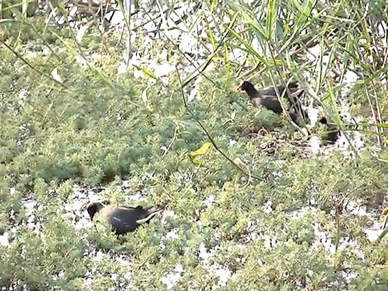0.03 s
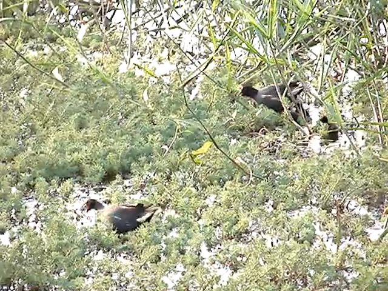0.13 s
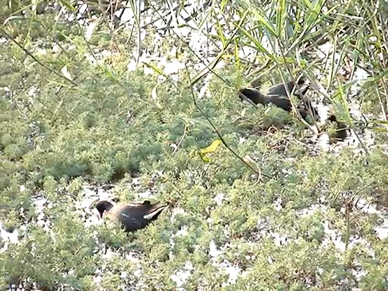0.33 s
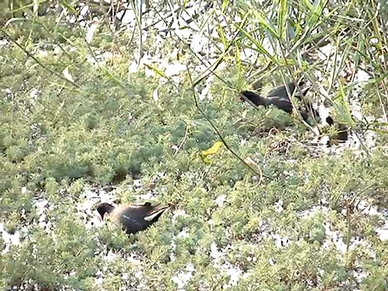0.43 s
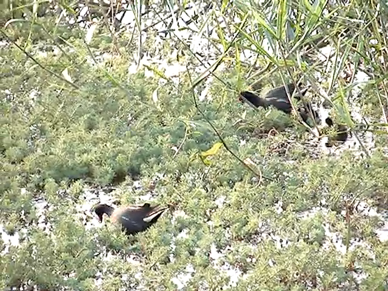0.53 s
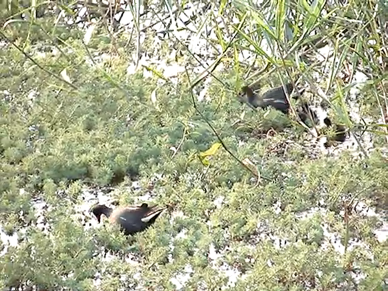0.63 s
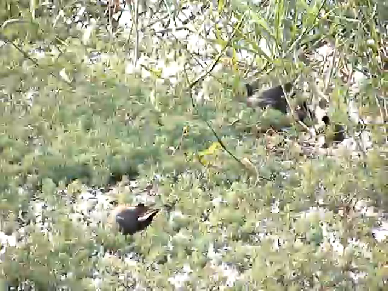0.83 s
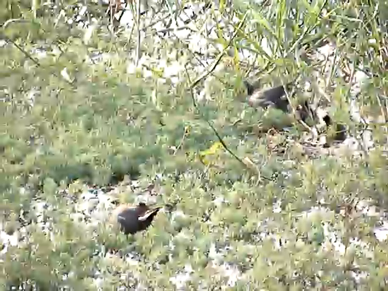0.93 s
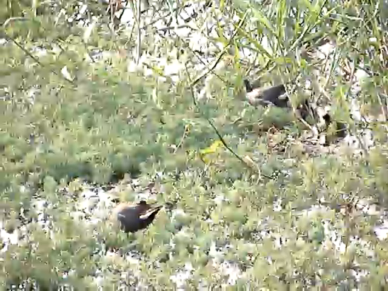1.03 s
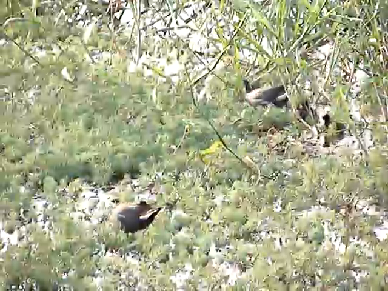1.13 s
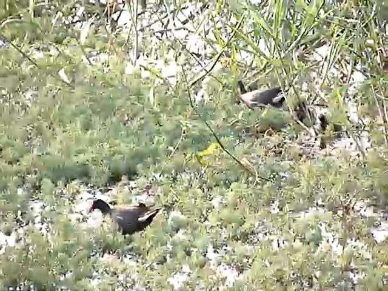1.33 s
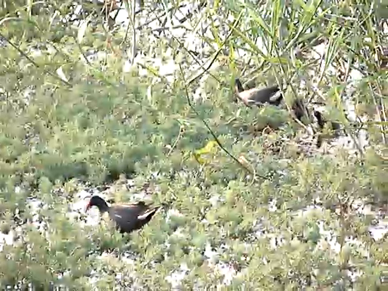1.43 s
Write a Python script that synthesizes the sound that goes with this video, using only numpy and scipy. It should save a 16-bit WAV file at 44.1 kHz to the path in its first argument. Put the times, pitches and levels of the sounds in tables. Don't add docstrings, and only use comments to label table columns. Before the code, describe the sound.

One loud, very short moorhen yelp comes early from a few metres away, echoing faintly across an open marsh; insects sizzle, a distant small bird whistles thinly, and wind increasingly buffets a small camera microphone.

```python
import sys
import numpy as np
from scipy import signal
from scipy.io import wavfile
from scipy.ndimage import uniform_filter1d

SR = 44100
rng = np.random.default_rng(int(sys.argv[2]) if len(sys.argv) > 2 else 0)


def to_wav(sig):
    pcm = np.clip(np.atleast_2d(sig), -1, 1) * 32767
    pcm = np.round(pcm).astype(np.int16)
    wavfile.write(sys.argv[1], SR, pcm.T)


def decibels_to_gain(level_db):
    exponent = np.asarray(level_db, float) / 20
    return 10 ** exponent


N = 66150


def level(x, db):
    return x * decibels_to_gain(db) / np.sqrt(np.mean(x ** 2))


def band(x, hz, width_hz):
    return signal.lfilter(*signal.iirpeak(hz, hz / width_hz, fs=SR), x)


def walk(rate):
    hold = int(SR / rate)
    held = rng.standard_normal(3000)[np.arange(N) // hold]
    slewed = uniform_filter1d(uniform_filter1d(held, hold), hold)
    return level(slewed, 0)


def gate(t, start, length, edge):
    ramp = np.clip(np.minimum(t - start, start + length - t) / edge, 0, 1)
    return np.sin(np.pi / 2 * ramp) ** 2


def late(x, delay):
    return np.interp(np.arange(N) - delay * SR, np.arange(N), x, left=0)


def blur(x, length):
    age = np.arange(SR // 4) / SR
    burst = rng.standard_normal(len(age)) * np.exp(-age / length)
    return signal.fftconvolve(x, burst / np.sqrt(np.sum(burst ** 2)))[:N]


# frequency in Hz, density in dB per Hz.
AIR_COLOUR = [(60, -6.5), (250, 1.5), (800, 5), (1800, 0), (2800, -13), (3900, -9), (7000, -62),
              (10000, -21)]


def air():
    table_hz, table_db = np.array(AIR_COLOUR).T
    out = 0
    for hz in 25 * 2 ** np.arange(0, 8.8, 1 / 3):
        noise = band(band(rng.standard_normal(N), hz, hz / 3), hz, hz / 2)
        flicker_db = 1.5 * walk(8.95)
        out = out + decibels_to_gain(np.interp(np.log(hz), np.log(table_hz), table_db) + flicker_db) * noise
    return level(out, -48.5)


def hum(t):
    hum_hz, hum_db, fade_s = 175, -58.5, .5
    line = np.sin(2 * np.pi * np.cumsum(hum_hz * (1 + 0.0031 * walk(6.6))) / SR)
    return decibels_to_gain(hum_db + 0.77 * walk(16)) * np.sqrt(2) * line / (1 + (t / fade_s) ** 4)


# time in seconds, level in dB.
GUSTS = [(0.4, -52), (0.482, -46), (0.522, -55.5), (0.546, -43), (0.712, -52.5), (0.76, -35), (0.788, -47),
         (1.042, -39), (1.082, -46), (1.178, -41.5), (1.202, -44.5), (1.248, -35.5), (1.272, -56),
         (1.312, -35), (1.364, -47), (1.394, -32.5), (1.454, -50), (1.5, -39.5)]


def rumble(hz, width_hz):
    wide = band(rng.standard_normal(N), hz, width_hz)
    return band(band(wide, hz, 1.53 * width_hz), hz, 3 * width_hz)


def wind(t):
    calm_db = -63.5
    gust_db = np.interp(t, *np.array(GUSTS).T, left=calm_db)
    flutter_db = walk(24.76)
    low = level(rumble(85, 81) * decibels_to_gain(flutter_db), -1)
    top = level(rumble(205, 170) * decibels_to_gain(1.7 * flutter_db), -10)
    push = decibels_to_gain(uniform_filter1d(gust_db, SR // 8)) * level(rumble(42, 45), -5)
    return decibels_to_gain(gust_db) * (low + top) + push


# centre in Hz, width in Hz, level in dB, throbs per second, throb depth in dB.
CHORUSES = [
    (4804, 620, -53.5, 53, -0.5),
    (5106, 350, -49, 24, 2.5),
    (5415, 410, -57, 50, -2),
    (6030, 580, -59, 76, 1),
    (9093, 1520, -51, 80, 0),
    (9130, 450, -58, 35, -1),
]


def insects():
    out = 0
    for hz, width_hz, db, rate, throb_db in CHORUSES:
        clicks = rng.standard_normal(N) * decibels_to_gain(2 * rng.exponential(size=N))
        ring = band(band(band(clicks, hz, width_hz), hz, 2 * width_hz), hz, 2 * width_hz)
        swell_db = 0.8 * walk(8.65)
        out = out + level(ring * decibels_to_gain(throb_db * walk(rate) + swell_db), db)
    return out


# start in seconds, length in seconds, first pitch in Hz, last pitch in Hz, level in dB.
WHISTLES = [
    (.39, .16, 4250, 3850, -59.5),
    (.65, .135, 4520, 3570, -57.5),
    (.72, .42, 4020, 4225, -57.5),
    (1.085, .215, 4560, 2980, -57),
]
WHISTLE_GLIDES = [0.45, 0.18, 0.065, 0.22]


def whistles(t):
    grain_per_s, grain_share, fall_db_per_khz, edge_s = 220, .55, 5, .03
    out = 0
    for (start, length, first_hz, last_hz, db), glide in zip(WHISTLES, WHISTLE_GLIDES):
        age = np.clip(t - start, 0, length)
        ease = (1 - np.exp(-age / glide)) / (1 - np.exp(-length / glide))
        hz = first_hz + (last_hz - first_hz) * ease
        husk = 1 + grain_share * (walk(grain_per_s) + 1j * walk(grain_per_s))
        size = decibels_to_gain(db + fall_db_per_khz * (hz - first_hz) / 1000) * gate(t, start, length, edge_s)
        out = out + size * np.real(husk * np.exp(2j * np.pi * np.cumsum(hz) / SR))
    return out + decibels_to_gain(-9) * blur(out, .02)


# delay in seconds, level in dB.
NEAR = [
    (.0066, -22),
    (.0125, -17),
]
# delay in seconds, level in dB, treble loss in dB per partial, blur in seconds.
ECHOES = [
    (.056, -24.5, -1.5, 0.0028),
    (.064, -36, -4, 0.0073),
    (0.081, -35, -2, 0.012),
    (.120, -33, -6, 0.0058),
    (.165, -37, 1, .02),
    (.225, -37.5, 3.5, .02),
    (.276, -28, 2.5, 0.0057),
    (.305, -32.5, -0.5, .015),
    (.372, -33, 1.5, 0.0013),
    (.455, -47.5, 8.5, 0.03),
]


def marsh(t, partials):
    near_ends_s, near_edge_s = .2575, .0018
    mirror_share = .7
    tail_from_s, tail_t60_s, tail_db, tail_low_hz = .056, 1.6, -26, 1600
    call = partials.sum(axis=0)
    near = sum(decibels_to_gain(db) * late(call, delay) for delay, db in NEAR)
    out = call + gate(t, 0, near_ends_s, near_edge_s) * near
    steps = 3 - np.array(PARTIALS)[:, :1]
    for delay, db, loss_db, smear in ECHOES:
        toned = (decibels_to_gain(loss_db * steps) * partials).sum(axis=0)
        echo = mirror_share * toned + np.sqrt(1 - mirror_share ** 2) * blur(toned, smear)
        out = out + decibels_to_gain(db) * late(echo, delay)
    tail = rng.standard_normal(N) * decibels_to_gain(-60 * t / tail_t60_s + 2 * walk(40)) * (t > tail_from_s)
    thin = signal.sosfilt(signal.butter(1, tail_low_hz, "high", fs=SR, output="sos"), call)
    return out + decibels_to_gain(tail_db) * signal.fftconvolve(thin, tail)[:N] / np.sqrt(SR / 20)


# time in seconds, pitch in Hz, level in dB.
YELP = [
    (.2104, 1118, -16),
    (.2135, 1128, -14),
    (.218, 1148, -13),
    (.228, 1151, -12.5),
    (.233, 1128, -13),
    (.238, 1097, -13),
    (.2485, 1052, -17),
    (.2505, 1048, -25),
    (.2565, 1030, -28),
]
# multiple of the pitch, level in dB.
PARTIALS = [(1, -7.5), (2, -8), (3, 0), (4, -22), (5, -38), (6, -46), (7, -46), (8, -36)]


def moorhen(t):
    edge_s, jitter, breath_db, throat_lag_rad = .0018, .003, -27, .4
    grace_s, grace_len_s, grace_db, grace_tilt_db = .2038, .0078, -27, -16
    grace_hz, grace_rise_hz_s, grace_opens_s = 1130, 20000, .0011
    beak_hz, beak_width_hz = 4280, 130
    s, hz, db = np.array(YELP).T
    pitch = np.interp(t, s, hz)
    phase = 2 * np.pi * np.cumsum(pitch * (1 + jitter * walk(300))) / SR
    size = decibels_to_gain(np.interp(t, s, db)) * gate(t, s[0], s[-1] - s[0], edge_s)
    age = t - grace_s
    grace_phase = 2 * np.pi * (grace_hz * age + grace_rise_hz_s * age ** 2 / 2)
    rows = []
    for k, db_k in PARTIALS:
        breath = decibels_to_gain(breath_db) * level(band(rng.standard_normal(N), k * hz[0], 900), 0)
        beak_db = 6 * np.exp(-((k * pitch - beak_hz) / beak_width_hz) ** 2)
        shimmer_db = (.6 if k <= 3 else 3.5) * walk(253.2)
        tone = decibels_to_gain(db_k + beak_db + shimmer_db) * np.cos(k * phase - throat_lag_rad * (k - 1) ** 2)
        lead = decibels_to_gain(grace_tilt_db * max(k - 3, 0)) * np.sin(k * grace_phase + k * k)
        opens = grace_opens_s * min(k - 1, 2)
        grace_len = grace_len_s - opens
        grace = decibels_to_gain(grace_db) * gate(age, opens, grace_len, grace_len / 2)
        rows.append(size * (tone + breath * decibels_to_gain(db_k / 2)) + grace * lead)
    return np.array(rows)


def scene():
    t = np.arange(N) / SR
    beds = air() + hum(t) + wind(t) + insects()
    return (beds + whistles(t) + marsh(t, moorhen(t)))[None]


def low_pass(x):
    return signal.sosfilt(signal.butter(12, 11120, fs=SR, output="sos"), x)


# time in seconds, level in dB, fall in seconds.
THUMPS = [
    (.2240, -24.5, .0011),
    (.2240, -40, .02),
    (.2345, -37, .0015),
    (.2365, -32, .0015),
]


def record(dry):
    ceiling, rise_s, top_hz = .8, .0002, 10004
    x = ceiling * np.tanh(dry / ceiling)
    for s, db, fall in THUMPS:
        age = np.maximum(np.arange(N) / SR - s, 0)
        x = x + decibels_to_gain(db) * (np.exp(-age / fall) - np.exp(-age / rise_s))
    x = signal.sosfilt(signal.ellip(14, .5, 90, top_hz, fs=SR, output="sos"), x)
    return low_pass(x)


dry = scene()
out = record(dry)
to_wav(out)
```